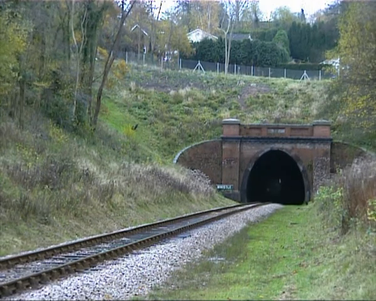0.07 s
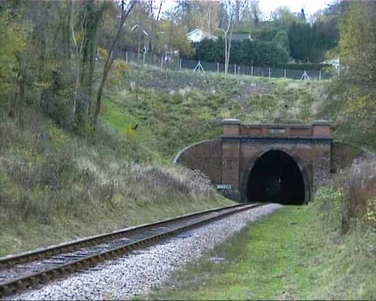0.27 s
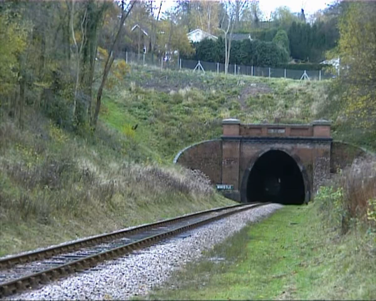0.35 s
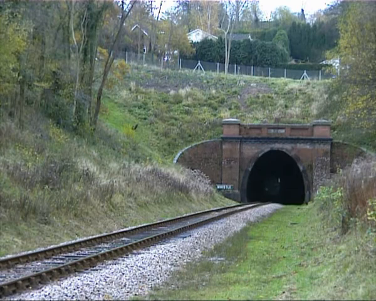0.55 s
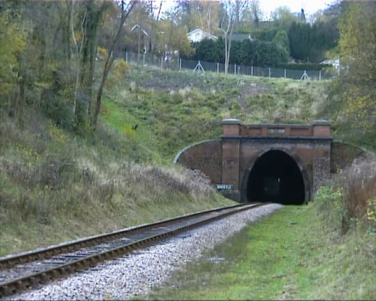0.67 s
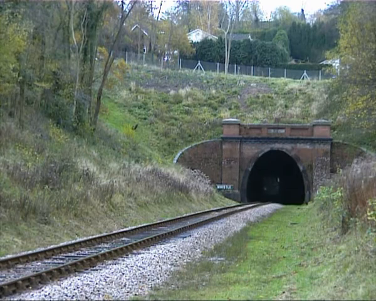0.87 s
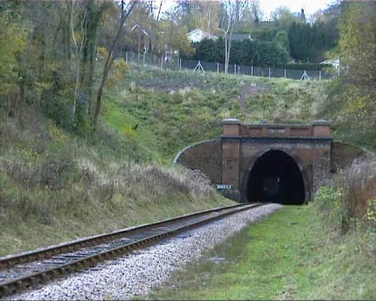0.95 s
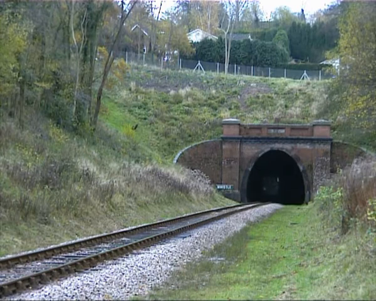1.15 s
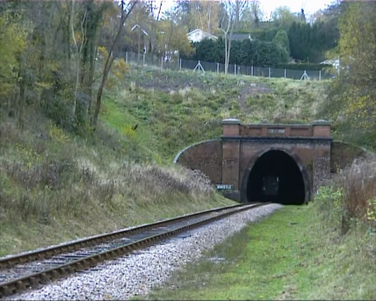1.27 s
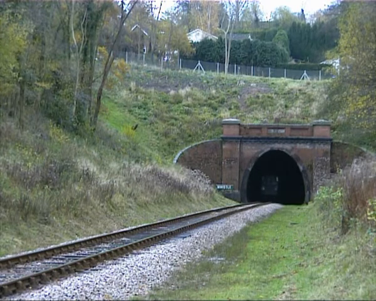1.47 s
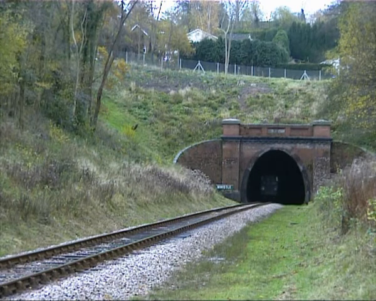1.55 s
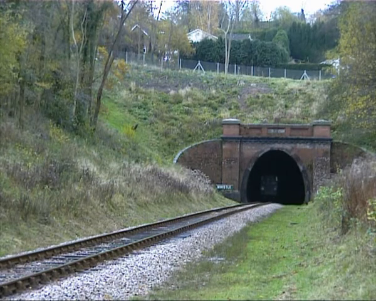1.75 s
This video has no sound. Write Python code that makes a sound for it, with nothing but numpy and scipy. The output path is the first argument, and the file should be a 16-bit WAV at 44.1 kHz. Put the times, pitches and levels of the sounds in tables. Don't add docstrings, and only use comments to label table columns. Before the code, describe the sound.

One loud, hoarse steam whistle blast of under a second bursts from a railway tunnel, smeared by fluttering echoes, then a long tail fades over low engine roar and soft wheel knocks, heard outdoors by a small stereo microphone.

```python
import sys
import numpy as np
from scipy import signal
from scipy.fft import rfft, irfft
from scipy.io import wavfile
from scipy.ndimage import uniform_filter1d

SR = 44100
rng = np.random.default_rng(int(sys.argv[2]) if len(sys.argv) > 2 else 0)


def transcribe(signal):
    frames = np.atleast_2d(signal).T
    limited = np.clip(frames, -1, 1)
    pcm = np.round(limited * 32767).astype(np.int16)
    wavfile.write(sys.argv[1], SR, pcm)


def natural_amplitude(level_db):
    exponent = np.asarray(level_db, float) / 20
    return 10 ** exponent


N = 79380

# (time [s], level [dB], brightness [dB per overtone])
VALVE = [
    (.165, -48.5, -8.5),
    (0.198, -20, -13),
    (0.262, -12, -3.5),
    (0.319, -10, -0.5),
    (.45, -17.5, 0),
    (0.598, -14, 0.37),
    (0.798, -24.5, 2.5),
    (0.936, -18.5, -5.5),
    (0.967, -39.5, -3),
]
# (frequency [Hz], density [dB per Hz])
ROAR_SPECTRUM = [(25, -49), (120, -22.5), (230, -2.5), (310, -12), (400, -5), (1300, -6.5), (4500, -27),
                 (15500, -60.5)]


def rms_one(x):
    return x / np.sqrt(np.mean(x ** 2) + 1e-20)


def in_time(rows):
    s, *columns = np.transpose(rows)
    return [np.interp(np.arange(N) / SR, s, c) for c in columns]


def at_hz(points, column=1):
    p = np.array(points)
    hz = np.arange(N + 1) * SR / (2 * N)
    return np.interp(np.log(hz + 1), np.log(p[:, 0]), p[:, column])


def drift(rate_hz):
    r = np.exp(-2 * np.pi * rate_hz / SR)
    slow = signal.lfilter([1], [1, -2 * r, r * r], rng.standard_normal(N + SR))
    return rms_one(slow[SR:])


def coloured(spectrum):
    white = rfft(rng.standard_normal(N), 2 * N)
    return rms_one(irfft(white * natural_amplitude(at_hz(spectrum)))[:N])


def resonance(x, hz, width_hz):
    r = np.exp(-np.pi * width_hz / SR)
    poles = [1, -2 * r * np.cos(2 * np.pi * hz / SR), r * r]
    return signal.lfilter([(1 - r * r) / 2, 0, -(1 - r * r) / 2], poles, x)


def whistle():
    # (time [s], frequency [Hz])
    pitch = [(.165, 812), (.21, 830), (.265, 850), (.32, 871), (.40, 884), (.55, 889), (.95, 889),
             (1.0, 895)]
    # (multiple [1], level [dB])
    overtones = [(1, -1.5), (2, -13), (3, -20), (4, -27), (5, -34), (6, -35.5), (7, -50.5), (8, -56),
                 (9, -57), (10, -60.5), (11, -60.5), (12, -74.5), (13, -69.5)]
    # (frequency [Hz], density [dB per Hz])
    jet = [(300, -12.5), (900, 0.5), (2500, -4), (5500, -18), (8000, -38.5), (15000, -55.5)]
    wander_hz, jitter_hz, shimmer_db, hiss_db = 3.5, 5, 1.2, -27.5
    (hz,), (db, bright_db) = in_time(pitch), in_time(VALVE)
    unsteady_hz = hz + wander_hz * drift(18.45) + jitter_hz * drift(150)
    phase = 2 * np.pi * np.cumsum(unsteady_hz) / SR
    tone = 0
    for k, level_db in overtones:
        overtone_db = level_db + bright_db * min(k - 1, 4) + shimmer_db * drift(25)
        tone = tone + natural_amplitude(overtone_db) * np.sin(k * phase)
    sample = np.arange(N)
    opened = (sample > VALVE[0][0] * SR) & (sample < VALVE[-1][0] * SR)
    return natural_amplitude(db) * opened * (tone + natural_amplitude(hiss_db) * coloured(jet))


def moving(x):
    # (closing speed [share of train speed], delay [s], level [dB])
    paths = [(1, 0, 0), (.75, .03, -3), (.55, .05, -5), (-1, .05, -3), (-.9, .065, -7), (2.2, .14, -15),
             (2.7, .2, -14), (3, .3, -14), (1.8, .36, -17), (2.4, .45, -21), (-.2, .4, -17)]
    speed_m_s, sound_m_s = 11.2, 343
    wall_delay_s, walls_db, rear_thin_hz = .06, -5.5, 1570
    t, start = np.arange(N) / SR, VALVE[0][0]
    thin = signal.lfilter(*signal.butter(1, rear_thin_hz, "high", fs=SR), x)
    closing = np.linspace(-.8, .9, 10)
    walls = [(c, wall_delay_s * d, walls_db) for c, d in zip(closing, rng.random(10))]
    total = np.zeros(N)
    for c, delay, db in [*paths, *walls]:
        ratio = (sound_m_s - speed_m_s) / (sound_m_s - speed_m_s * c)
        emitted = start + (t - start - delay) * ratio
        total += natural_amplitude(db) * np.interp(emitted, t, x if c > .5 else thin)
    return total


def tunnel(x):
    bore_t60_s, cutting_t60_s, cutting_db, wall_cut_hz = 0.29, 1.523, -7.5, 10500
    t = np.arange(N) / SR
    bore = rng.standard_normal(N) * natural_amplitude(-60 * t / bore_t60_s)
    dull = signal.lfilter(*signal.butter(1, wall_cut_hz, fs=SR), rng.standard_normal(N))
    tail = dull * natural_amplitude(-60 * t / cutting_t60_s)
    echoes = (rms_one(bore) + natural_amplitude(cutting_db) * rms_one(tail)) / np.sqrt(N)
    return signal.fftconvolve(x, echoes)[:N]


def engine():
    # (time [s], level [dB])
    approach = [(0.0, -48.5), (0.882, -50), (1.378, -47.5), (1.8, -47.5)]
    over_db = 8
    db, = in_time(approach)
    roar, shared = coloured(ROAR_SPECTRUM), drift(9)
    low = signal.sosfilt(signal.butter(2, 450, fs=SR, output="sos"), roar)
    high = signal.sosfilt(signal.butter(2, 1600, "high", fs=SR, output="sos"), roar)
    middle = roar - low - high
    lumpy = sum(p * natural_amplitude(.7 * shared + .9 * drift(15)) for p in (low, middle, high))
    return natural_amplitude(db + over_db) * lumpy


def hum():
    # (time [s], level [dB])
    strength = [(0.0, -53), (1.108, -54.5), (1.148, -40.5), (1.192, -55), (1.228, -42.5), (1.468, -45.5),
                (1.574, -65.5), (1.614, -48.5), (1.654, -39.5), (1.724, -38), (1.774, -59.5), (1.8, -50)]
    mode_hz, width_hz = 219.6, 18
    db, = in_time(strength)
    once = resonance(rng.standard_normal(N), mode_hz, width_hz)
    return natural_amplitude(db) * rms_one(resonance(once, mode_hz, 2 * width_hz))


def knocks():
    # (time [s], level [dB])
    blow_times = [
        (.14, -39.5),
        (0.366, -28),
        (1.42, -37.5),
        (1.737, -30.5),
    ]
    # (frequency [Hz], level [dB], decay time T60 [s], not used below)
    modes = [(660, 4.5, 0.13), (1088, -3, 0.074), (1530, -8, 0.15), (1850, -5, 0.11), (2340, -9.5, 0.064),
             (2480, -37, 0.11), (2570, -10, 1.2)]
    rise_s, fall_s, cut_hz, puff_db = .008, .013, 5000, -0.5
    t = np.arange(N) / SR
    shape = np.zeros(N)
    for s, db in blow_times:
        shape += natural_amplitude(db) * np.exp(np.where(t < s, (t - s) / rise_s, (s - t) / fall_s))
    ring = sum(natural_amplitude(db) * rms_one(resonance(rng.standard_normal(N), hz, 60)) for hz, db, _ in modes)
    blows = shape * (rms_one(ring) + natural_amplitude(puff_db) * coloured(ROAR_SPECTRUM))
    return signal.sosfilt(signal.butter(4, cut_hz, fs=SR, output="sos"), blows)


def ports(x, side):
    # (frequency [Hz], left's phase lead [rad], left minus right [dB])
    port_pair = [(60, -2.9, 0), (260, -2.3, -1), (500, -1.3, -2.5), (870, -.65, -3.3), (1700, -.15, -2),
                 (3000, 0, -.5), (5500, 0, 1), (12000, 0, -.5)]
    dip_hz, dip_width_hz, dip_db = 3867, 310, -9
    hz = np.arange(N + 1) * SR / (2 * N)
    dip = natural_amplitude(dip_db * np.exp(-((hz - dip_hz) / dip_width_hz) ** 2))
    half = natural_amplitude(at_hz(port_pair, column=2) / 2) * np.exp(.5j * at_hz(port_pair))
    a, b = rfft(x, 2 * N) * dip, rfft(side, 2 * N) * dip
    return irfft(np.array([(a + b) * half, (a - b) / half]))[:, :N]


def level_control(x):
    limit_db, share, release_db_per_s = -9, .5, 120
    fall = release_db_per_s * np.arange(N) / SR
    peak_db = 20 * np.log10(np.abs(x).max(axis=0) + 1e-9)
    held_db = np.maximum.accumulate(peak_db + fall) - fall
    over_db = uniform_filter1d(np.maximum(held_db - limit_db, 0), size=150)
    return x * natural_amplitude(-share * over_db)


def level_ticks():
    # (time [s], click [dB], thump [dB])
    gain_steps = [(0.316, -29, -53.5), (.377, -31.5, -27), (0.413, -35, -43), (0.484, -53.5, -55),
                  (0.594, -28, -62), (.598, -39.5, -57), (0.601, -34.5, -64.5), (.715, -40.5, -63.5),
                  (0.792, -32, -40), (.794, -46.5, -68.5), (0.926, -33, -52.5), (.958, -29, -57),
                  (1.799, -53, -40)]
    click_fall_s, thump_fall_s = .00006, .0037
    t = np.arange(N) / SR
    total = np.zeros(N)
    for s, click_db, thump_db in gain_steps:
        click = natural_amplitude(click_db) * np.exp(-np.abs(t - s) / click_fall_s)
        thump = natural_amplitude(thump_db) * np.exp(-np.abs(t - s) / thump_fall_s)
        total += (t >= s) * (click + thump)
    return total


def scene():
    direct_db, wide_db, roar_wide_db = 0, -17, -7.5
    blast = moving(whistle())
    near = natural_amplitude(direct_db) * blast + tunnel(blast) + engine() + hum() + knocks()
    side = natural_amplitude(wide_db) * tunnel(blast) + natural_amplitude(roar_wide_db) * engine()
    return ports(near, side)


def roll_off(x):
    return signal.sosfilt(signal.butter(12, 16040, fs=SR, output="sos"), x)


def record(dry):
    bend, self_noise_db, scan_hz, scan_db, cutoff_hz = .012, -69, 15690, -88.5, 16050
    t = np.arange(N) / SR
    bent = signal.lfilter(*signal.butter(1, 15, "high", fs=SR), bend * dry ** 2)
    self_noise = natural_amplitude(self_noise_db) * rng.standard_normal((2, N))
    scan_line = natural_amplitude(scan_db) * np.sin(2 * np.pi * scan_hz * t)
    x = level_control(dry) + bent - level_ticks() + self_noise + scan_line
    x = signal.sosfilt(signal.cheby2(16, 60, cutoff_hz, fs=SR, output="sos"), x)
    return roll_off(x)


dry = scene()
out = record(dry)
transcribe(out)
```